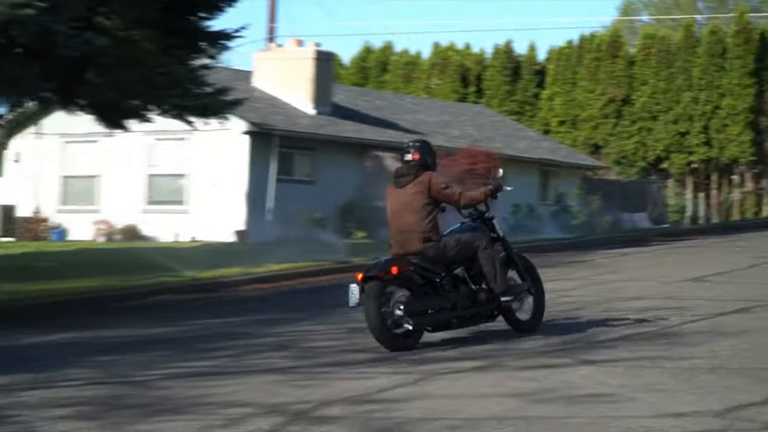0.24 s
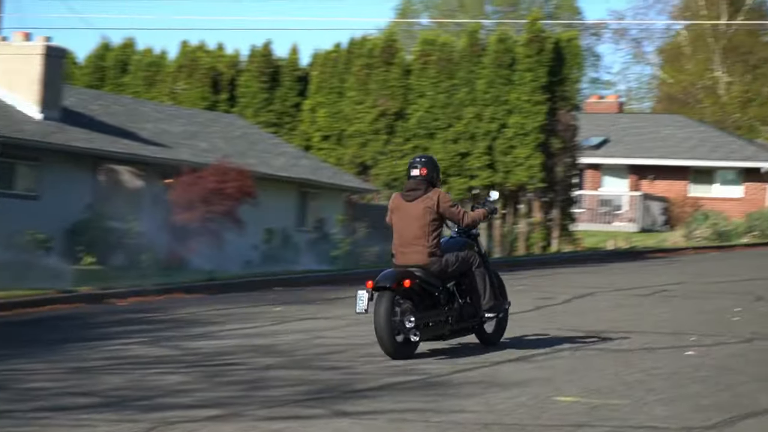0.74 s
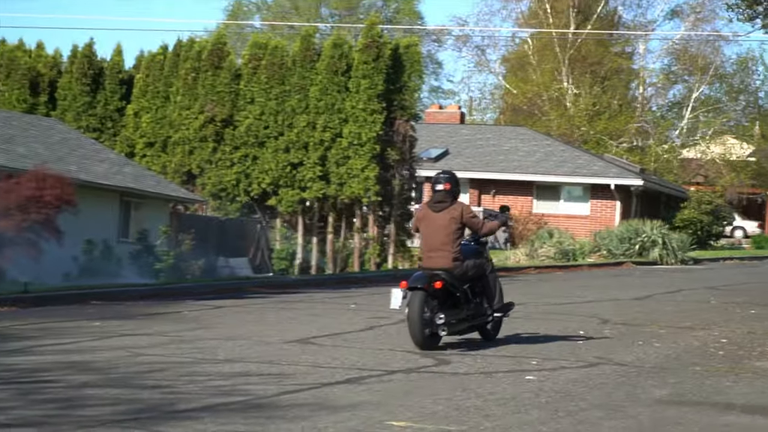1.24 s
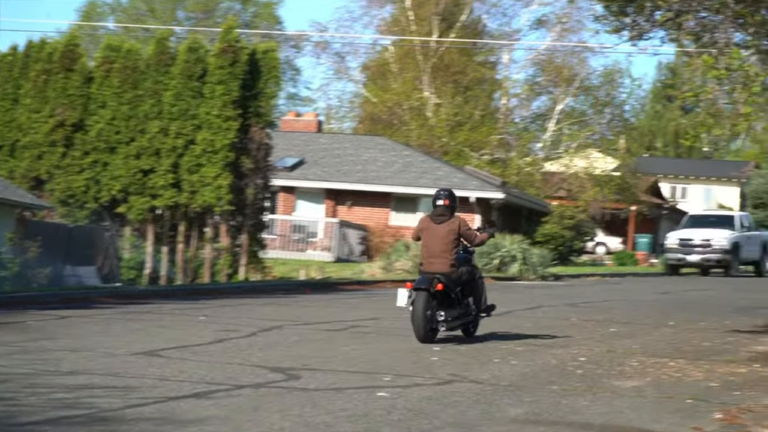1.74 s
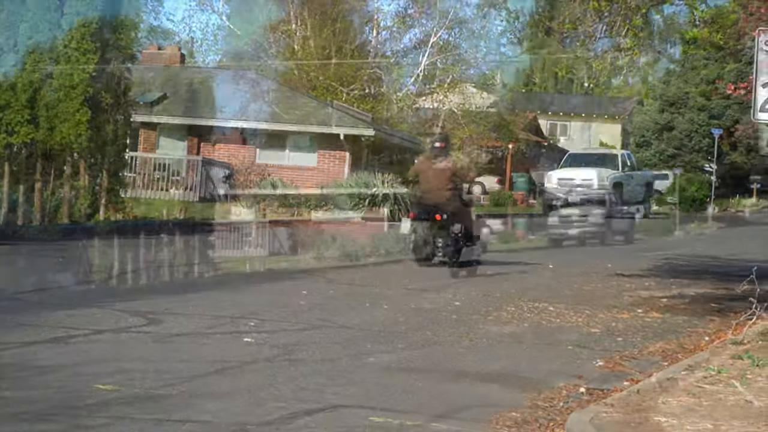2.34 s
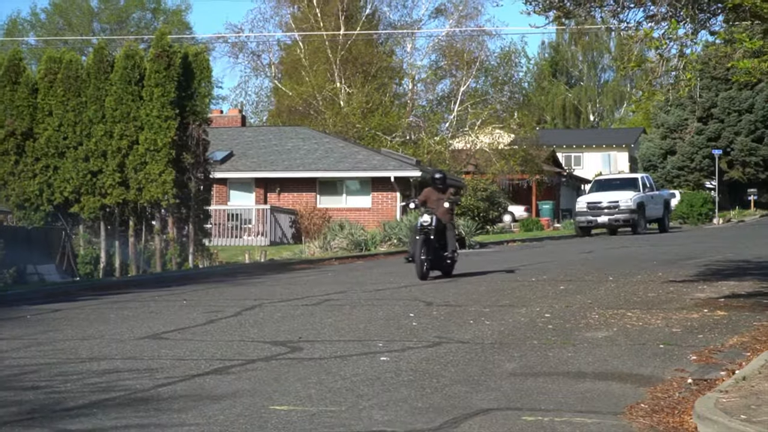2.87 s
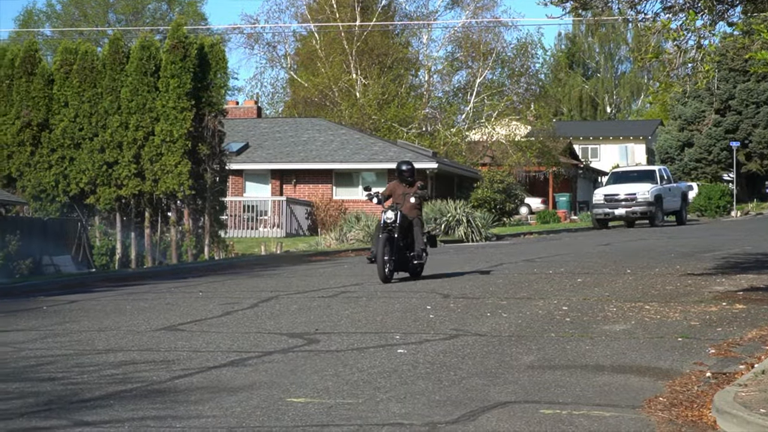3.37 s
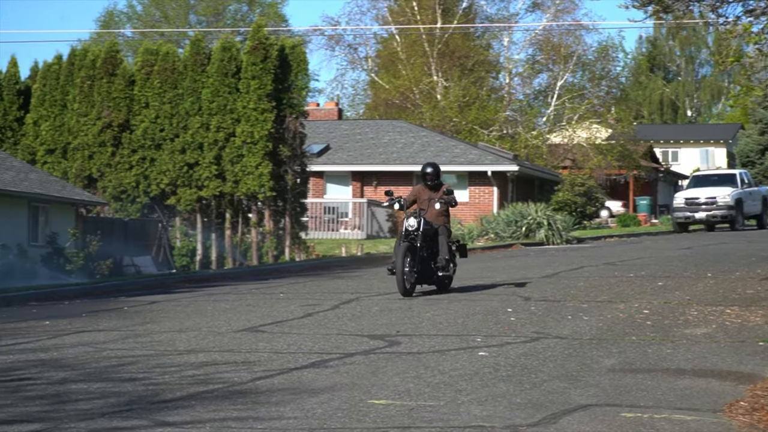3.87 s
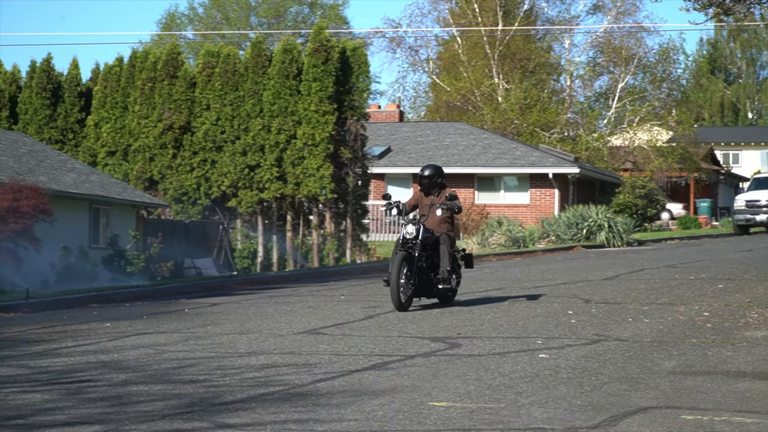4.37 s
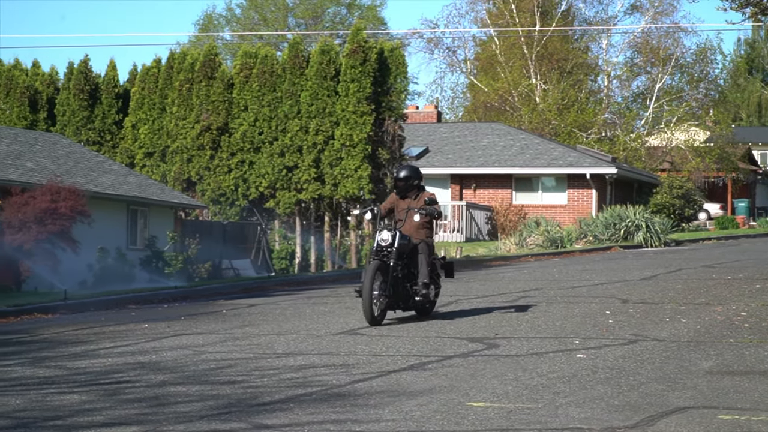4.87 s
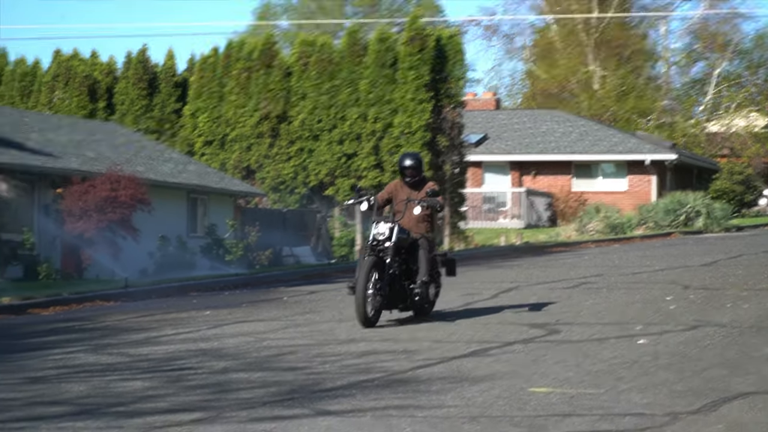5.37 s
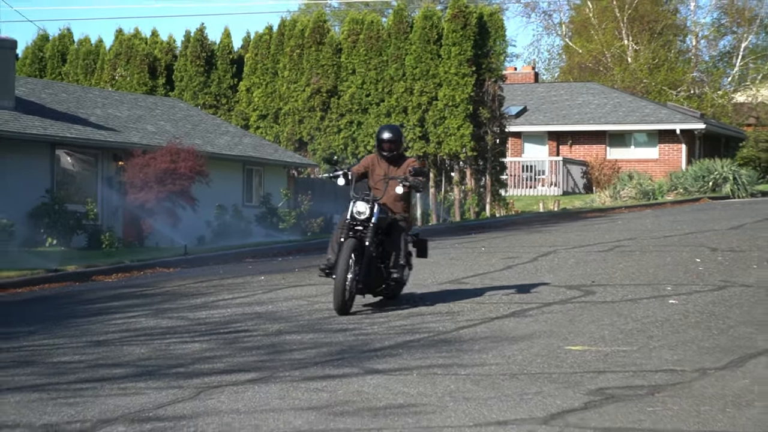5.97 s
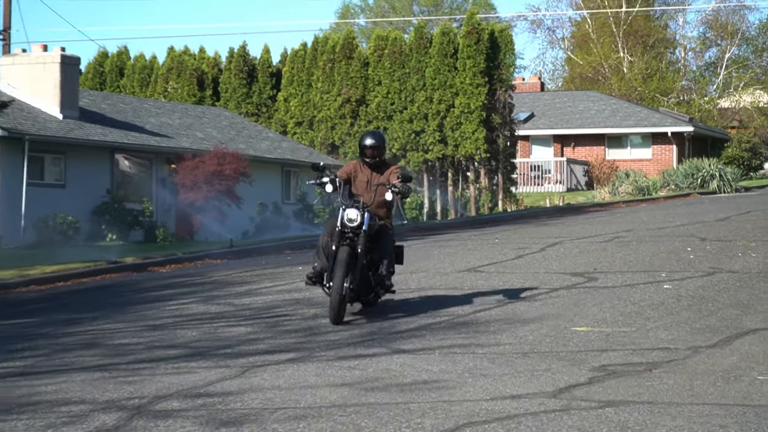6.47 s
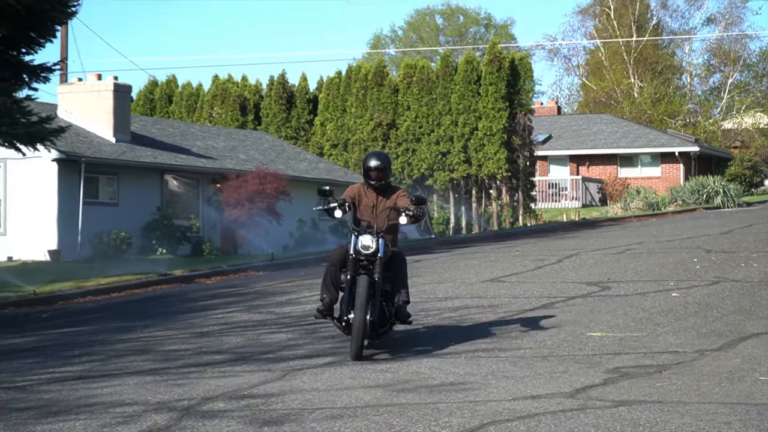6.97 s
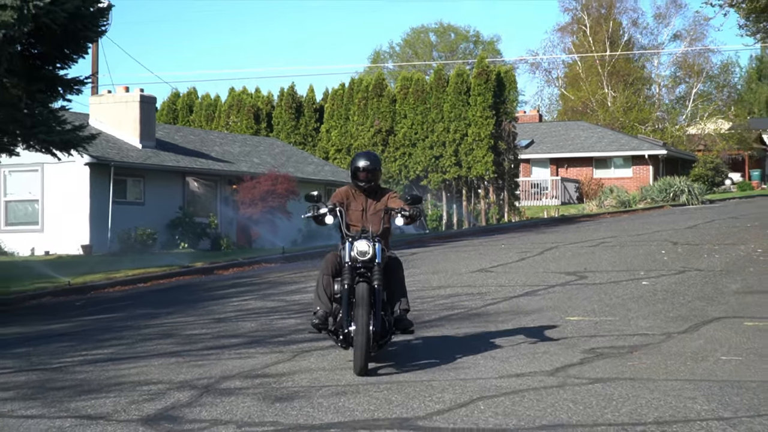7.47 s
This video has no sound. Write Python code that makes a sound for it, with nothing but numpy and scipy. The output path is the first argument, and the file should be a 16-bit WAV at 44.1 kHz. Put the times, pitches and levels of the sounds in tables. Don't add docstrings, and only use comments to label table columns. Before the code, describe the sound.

A large twin-cylinder motorcycle on an open, quiet suburban street, heard from the roadside in mono. From 0 to 2.2 seconds it pulls away under load: a strong, deep, rapid exhaust beat rises steadily in pitch, with raspy gas ticks, metallic clatter and wavering gear whine, its treble dulling as the machine turns away. Around 2.2 to 2.5 the throttle closes, a loud gear clunk rattles and the engine dies away quickly. A more distant, softer engine fades in at once, slowing with a falling whine until about 3.6. At 3.7 a short, solid clunk drops it into gear. Then a lumpy idle, about seventeen uneven thumps a second, with weak beats and fluttering mechanical whine, gradually comes nearer and louder until the end at 7.7. Faint bird whistles appear around 6, 6.5 and 7.1 over very soft leaves and hiss.

```python
import sys
import numpy as np
from scipy import signal
from scipy.io import wavfile
from scipy.ndimage import uniform_filter1d

SR = 44100
rng = np.random.default_rng(int(sys.argv[2]) if len(sys.argv) > 2 else 0)


def log_audio(samples):
    frames = np.atleast_2d(samples).T
    limited = np.clip(frames, -1, 1)
    pcm = np.round(limited * 32767).astype(np.int16)
    wavfile.write(sys.argv[1], SR, pcm)


def makeup_ratio(level_db):
    decades = np.asarray(level_db, float) / 20
    return 10 ** decades


N = 340452
T = np.arange(N) / SR

# (time [s], four-stroke cycle rate [Hz])
IDLE_CYCLE_HZ = [(2.2, 11.92), (2.6, 11.29), (3.2, 9.29), (3.6, 8.75), (4.4, 8.74), (5.4, 8.36),
                 (5.6, 8.71), (6.0, 8.27), (6.6, 9.16), (7.2, 8.18), (7.72, 8.97)]


def rms_one(x):
    return x / np.sqrt(np.mean(x ** 2) + 1e-20)


def in_time(rows):
    s, *columns = np.transpose(rows)
    return [np.interp(T, s, c) for c in columns]


def drift(rate):
    r = np.exp(-80 * np.pi * rate / SR)
    slow = signal.lfilter([1], [1, -2 * r, r * r], rng.standard_normal(N // 40 + 2002))[2000:]
    return np.interp(np.arange(N) / 40, np.arange(len(slow)), rms_one(slow))


def band(x, low_hz, high_hz):
    return signal.sosfilt(signal.butter(2, [low_hz, high_hz], "band", fs=SR, output="sos"), x)


def band_noise(low_hz, high_hz):
    return rms_one(band(rng.standard_normal(N), low_hz, high_hz))


def street():
    leaves = makeup_ratio(-62.5 + drift(1.2)) * band_noise(2700, 8850)
    return leaves + makeup_ratio(-74) * band_noise(10200, 13000)


def birds():
    # (time [s], length [s], start pitch [Hz], end pitch [Hz], level [dB])
    chirps = [
        (5.94, .04, 4900, 3900, -52),
        (5.975, .025, 3640, 3400, -53),
        (6.056, 0.06, 4930, 3300, -54),
        (6.176, .02, 3300, 3700, -53),
        (6.46, 0.031, 3700, 3300, -51),
        (7.06, 0.037, 3900, 4400, -51),
    ]
    out = np.zeros(N)
    for s, length_s, from_hz, to_hz, db in chirps:
        share = np.clip((T - s) / length_s, 0, 1)
        cycles = np.cumsum(from_hz + (to_hz - from_hz) * share) / SR
        out += makeup_ratio(db) * np.sin(np.pi * share) * np.sin(2 * np.pi * cycles)
    return out


def clunks():
    # (time [s], peak level [dB])
    blows = [(2.3, -19.5), (2.303, -23), (2.311, -25), (2.341, -30), (2.36, -35), (2.409, -34),
             (3.7155, -24.5), (3.7185, -24.5), (3.7225, -22.5), (3.7279, -25), (3.733, -27), (3.742, -28)]
    # (frequency [Hz], level [dB], t60 [s])
    modes = [(375, -3, .025), (800, 0, .03), (1050, -4, .015), (1300, -5, .015), (1760, -6, .02),
             (2300, -6, .008), (2900, -5, .008), (3850, -7, .007), (5200, -9, .005)]
    push = .12
    decay = np.exp(-np.arange(400) / SR / 0.0014)
    burst, out = np.zeros(N), np.zeros(N)
    contacts = rng.standard_normal((len(blows), 400))
    for (s, db), grit in zip(blows, contacts):
        i = round(s * SR)
        burst[i:i + 400] += makeup_ratio(db - 20) * (push + grit) * decay
    for hz, db, t60_s in modes:
        r, w = makeup_ratio(-60 / (t60_s * SR)), 2 * np.pi * hz / SR
        out += makeup_ratio(db) * signal.lfilter([0, np.sin(w)], [1, -2 * r * np.cos(w), r * r], burst + 1e-18)
    through_cases = signal.butter(3, 5500, fs=SR, output="sos")
    return signal.sosfilt(through_cases, out + makeup_ratio(10) * band(burst, 400, 3500))


def crank(speed, start):
    rate_hz, = in_time(speed)
    return start + np.cumsum(rate_hz * (T >= speed[0][0])) / SR


def clatter(spectrum, casing, throb, bright_db, patchy_db):
    out, edges_hz = 0, 250 * 2 ** (np.arange(19) / 3)
    white = rng.standard_normal((3, N))
    hz, db = np.transpose(spectrum)
    for k, (low, high) in enumerate(zip(edges_hz, edges_hz[1:])):
        level_db = np.interp(np.log(low * high) / 2, np.log(hz), db)
        level_db = level_db + bright_db * np.clip(np.log2(low / 1500), 0, 1)
        out = out + makeup_ratio(level_db + patchy_db * drift(27.5)) * band(white[k % 2], low, high)
    out = rms_one(out)
    for mid_hz, width_hz, ring_db in casing:
        ringing = rms_one(band(white[2], mid_hz - width_hz / 2, mid_hz + width_hz / 2))
        out = out + makeup_ratio(ring_db + bright_db * (mid_hz > 1500)) * ringing
    return out * throb / throb.mean()


def gears(cycles, meshes, wobble, flicker_db):
    out, rate = 0, np.gradient(cycles)
    for multiple, db, wander in meshes:
        uneven = wander * drift(25.74) + wobble * np.sin(4 * np.pi * cycles)
        turned = cycles + np.cumsum(rate * uneven)
        out = out + makeup_ratio(db + flicker_db * drift(51)) * np.sin(2 * np.pi * multiple * turned)
    return out


def ticks(cycles, bright_db):
    force = makeup_ratio(2.5 * rng.standard_normal((170, 2)))
    gate = 0
    for k, share in enumerate([0.58, 0.95]):
        since = (cycles - share) % 1
        turn = (cycles - share + 1).astype(int)
        gate = gate + force[turn, k] * since / 0.025 * np.exp(-since / 0.042)
    hiss = makeup_ratio(-19 + bright_db) * band_noise(6000, 11500)
    return gate * (hiss + makeup_ratio(0.5) * band_noise(870, 1370))


def snaps(cycles):
    depth = makeup_ratio(2.5 * rng.standard_normal((170, 2)))
    shuttings = [(.228, .009), (.808, .009)]
    dips = 0
    for k, (share, width) in enumerate(shuttings):
        ahead = cycles - share + .5
        dips = dips + depth[ahead.astype(int), k] * np.exp(-((ahead % 1 - .5) / width) ** 2)
    return -.9 * (dips - uniform_filter1d(dips, 900))


def exhaust(cycles, waves, rear_lag, rear_db, orders, uneven_db, jitter):
    out = np.zeros(N)
    for cylinder, lag in enumerate([0, rear_lag]):
        firing = 1.3 * np.tanh(rng.standard_normal((170, 2 + len(waves))))
        for k, (share, width, *height) in enumerate(waves):
            ahead = cycles - lag - share + 2.5
            turn = ahead.astype(int)
            offset = ahead - turn - .5 - jitter * firing[turn, 0]
            strength = firing[turn, 1] + .5 * firing[turn, 2 + k]
            force = makeup_ratio(cylinder * rear_db + uneven_db * strength)
            out += height[cylinder] * force * np.exp(-np.abs(offset / width) ** 2.2)
    overtones = 0
    for multiple, db in orders:
        overtones = overtones + makeup_ratio(db + 2 * drift(0.43)) * np.sin(2 * np.pi * multiple * cycles)
    return rms_one(out - uniform_filter1d(out, 1900)) + overtones


def lean():
    lean_s = [2.6, 2.74, 2.95, 3.16, 3.55, 3.95, 4.16, 4.56, 4.95, 5.2, 5.4, 5.79, 6.04, 6.29, 6.74, 6.97,
              7.18]
    return sum(np.exp(-((T - s) / .06) ** 2) for s in lean_s)


def approach():
    # (time [s], distance [m])
    distance = [(2.2, 24.8), (4.3, 21.2), (4.9, 19.8), (5.9, 15.5), (6.3, 13.6), (7.1, 11.7), (7.4, 10.6),
                (7.72, 9.3)]
    (metres,), (rate_hz,) = in_time(distance), in_time(IDLE_CYCLE_HZ)
    near_db = 20 * np.log10(10 / metres)
    braking_db = 4 * np.clip(rate_hz - 9.5, 0, 1) * np.clip((T - 2.62) / 0.091, -1, 1)
    whine_db = -55 + (np.minimum(rate_hz, 9.1) - 8.91) + braking_db
    clutch_in_s = 3.44
    overtone_db = -50 + near_db - 10 * np.clip((clutch_in_s - T) / .3, 0, 1)
    return -26.2 + near_db, -40 + 0.69 * near_db, whine_db, overtone_db


def rolling_in():
    waves = [(0.05, 0.027, -0.03, -0.32), (0.132, 0.028, 1.35, 0.85), (0.191, 0.018, -0.33, -0.17),
             (0.23, 0.019, -0.77, -0.75), (0.274, 0.036, 1.08, 1.0), (0.345, 0.023, -0.47, -0.56),
             (0.431, 0.042, 0.46, 0.45), (0.505, 0.016, -0.67, -0.29), (0.55, 0.041, 0.67, -0.4)]
    # (multiple of cycle rate [1], level re exhaust [dB])
    orders = [(13, -20), (16, -24), (38, -25)]
    # (frequency [Hz], density [dB per Hz])
    spectrum = [(180, 22), (300, -3.5), (641, 1.5), (731, -3), (1120, -11.5), (1460, -10), (2480, -17),
                (2920, -15), (3230, -16.5), (15500, -52)]
    # (frequency [Hz], width [Hz], level re clatter [dB])
    casing = [(582, 223, -7.5), (1240, 185, -15), (4344, 290, -26)]
    # (multiple of cycle rate [1], level [dB], wander [share])
    idle_meshes = [(166, 0, .018), (150, -6, .03)]
    overtone_meshes = [(333, -2.5, .022), (394, -26, .02), (501, -15, .02)]
    coast_meshes = [(132, -56, 0.0081), (210, -84, 0.01)]
    cycles = crank(IDLE_CYCLE_HZ, .5385)
    exhaust_db, clatter_db, whine_db, overtone_db = approach()
    short_charge = lean()
    pulses = exhaust(cycles, waves, .582, 0, orders, uneven_db=1.2, jitter=.006)
    pulses = pulses + makeup_ratio(-8 * short_charge) * snaps(cycles)
    pulses = makeup_ratio(.1 - 3 * short_charge) * (pulses + .5 * band(pulses, 110, 260))
    throb = 1 + 0.039 * uniform_filter1d(np.abs(pulses), 300)
    rumble = makeup_ratio(-15) * band_noise(70, 260)
    noise = makeup_ratio(clatter_db) * clatter(spectrum, casing, throb, 0, patchy_db=1.2)
    coast_gate = np.clip((3.68 - T) / .3, 0, 1) * np.clip((T - 2.6) / 0.5, 0, 1)
    coasting = coast_gate * gears(cycles, coast_meshes, wobble=0.0032, flicker_db=-2.0)
    wobble = .02 * (8.6 / np.gradient(cycles + T) / SR) ** 3
    whine = makeup_ratio(whine_db) * gears(cycles, idle_meshes, wobble, flicker_db=5.0)
    whine += makeup_ratio(overtone_db) * gears(cycles, overtone_meshes, wobble, flicker_db=4.5)
    fade = np.clip((T - 2.2) / .28, 0, 1)
    return fade * (makeup_ratio(exhaust_db) * (pulses + rumble) + noise + whine + coasting)


def throttle():
    shut_s = np.maximum(T - 2.17, 0)
    exhaust_db = -13.8 - 1.0 * T - 31 * shut_s - 53 * shut_s ** 2
    rear_db = -8 * np.minimum(shut_s / 0.085, 1)
    bark_db = 2.5 * np.exp(-T / 0.25)
    slack_db = -120 * np.maximum(T - 2.346, 0)
    bright_db = .6 - 4 * np.clip(T - 0.87, 0, 2)
    return exhaust_db, rear_db, -32.5 + bark_db + slack_db, bright_db


def pulling_away():
    # (time [s], four-stroke cycle rate [Hz])
    speed = [(0.0, 14.96), (0.9, 17.78), (1.2, 18.83), (2.2, 21.57), (2.5, 19.24)]
    waves = [(0.632, 0.029, 0.66, 1.19), (0.653, 0.027, -0.8, -0.67), (0.705, 0.027, -0.6, -0.42),
             (0.793, 0.045, 0.55, 1.17), (0.8, 0.031, 0.45, -1.34), (0.836, 0.031, -0.56, 0.22),
             (0.895, 0.029, -0.63, -0.56), (0.967, 0.037, 0.21, 0.13), (1.028, 0.015, -0.33, 0.23),
             (1.107, 0.031, -0.43, -0.19)]
    # (multiple of cycle rate [1], minus = opposite polarity, level re exhaust [dB])
    orders = [(-17, -25.5), (19, -41), (21, -29), (23, -29), (25, -28), (28, -33.5)]
    # (frequency [Hz], density [dB per Hz])
    spectrum = [(180, -15), (300, 0.5), (552, -10.5), (610, 0.5), (781, -11.5), (1240, -12.5), (2140, -20),
                (2650, -19.5), (5470, -27.5), (15500, -62)]
    # (frequency [Hz], width [Hz], level re clatter [dB])
    casing = [(930, 134, -17), (2570, 470, -17), (5570, 460, -22), (7620, 140, -32.5)]
    # (multiple of cycle rate [1], level [dB], wander [share])
    meshes = [(30.85, -43.5, 0.001), (61.3, -50, 0.0089), (154, -55.5, 0.0119), (169.4, -55.5, 0.0119)]
    cycles = crank(speed, .0075)
    exhaust_db, rear_db, clatter_db, bright_db = throttle()
    pulses = exhaust(cycles, waves, .4116, rear_db, orders, uneven_db=.4, jitter=.001)
    pipe_hz, pipe_width_hz = 241, 118
    standing = band(pulses, pipe_hz - pipe_width_hz / 2, pipe_hz + pipe_width_hz / 2)
    pulses = pulses + makeup_ratio(-13 + 10.6 * np.exp(-T / 0.63)) * standing
    pulses = pulses + np.maximum(.7 - .75 * T, -.6) * band(pulses, 300, 480)
    throb = 1 + 0.29 * uniform_filter1d(np.abs(pulses), 200)
    noise = clatter(spectrum, casing, throb, bright_db, patchy_db=0.78)
    turning_db = 5 * (np.minimum(T, 1.6) - 1.2)
    hidden_db = -14 * np.clip(T - 1.15, 0, .6)
    meshing = makeup_ratio(36 + turning_db) * gears(cycles, meshes[:1], wobble=.002, flicker_db=3.5)
    meshing += makeup_ratio(37.5 - turning_db / 2) * gears(cycles, meshes[1:2], wobble=0.0036, flicker_db=5.5)
    meshing += makeup_ratio(38 + hidden_db) * gears(cycles, meshes[2:], wobble=0.004, flicker_db=4.5)
    rumble = makeup_ratio(-21) * band_noise(40, 300)
    metal = noise + ticks(cycles, bright_db) + makeup_ratio(rear_db) * meshing
    fade = np.clip((2.5 - T) / 0.057, 0, 1)
    return fade * (makeup_ratio(exhaust_db - 1.25) * (pulses + rumble) + makeup_ratio(clatter_db) * metal)


def scene():
    return (street() + birds() + clunks() + rolling_in() + pulling_away())[None]


def roll_off(x):
    return signal.sosfilt(signal.butter(12, 15610, fs=SR, output="sos"), x)


def record(dry):
    return roll_off(dry)


dry = scene()
out = record(dry)
log_audio(out)
```